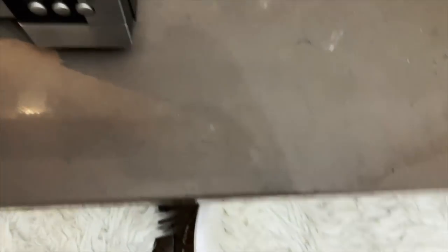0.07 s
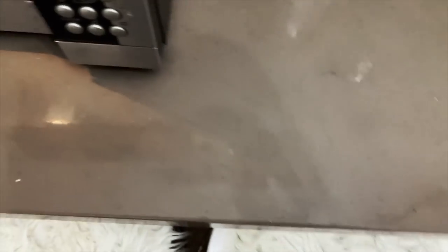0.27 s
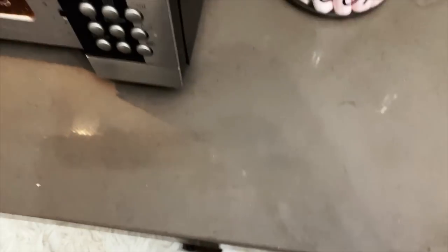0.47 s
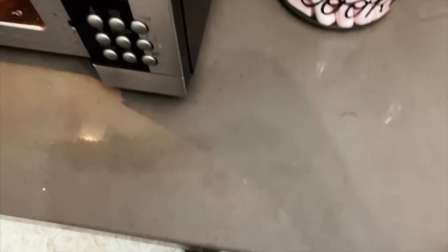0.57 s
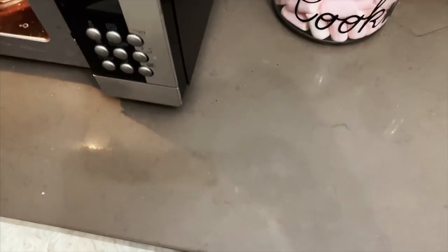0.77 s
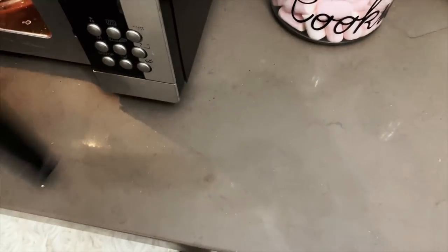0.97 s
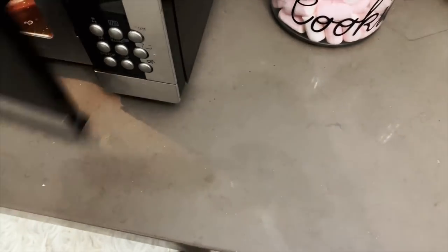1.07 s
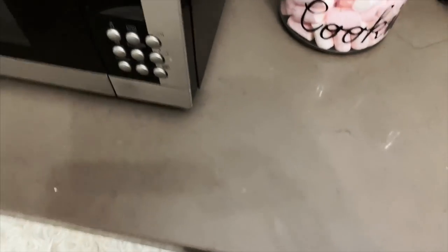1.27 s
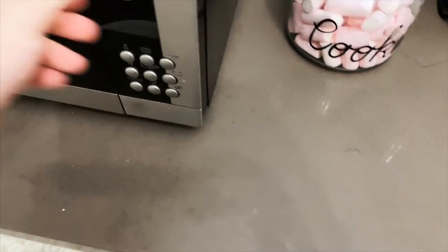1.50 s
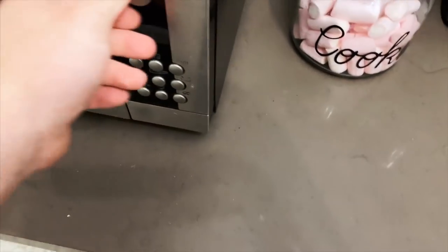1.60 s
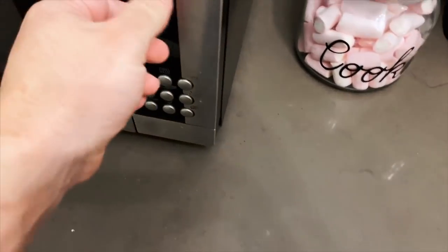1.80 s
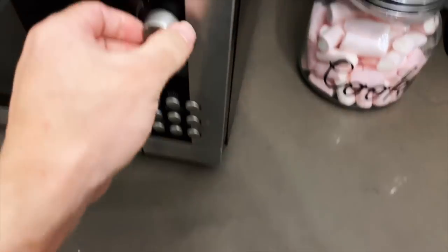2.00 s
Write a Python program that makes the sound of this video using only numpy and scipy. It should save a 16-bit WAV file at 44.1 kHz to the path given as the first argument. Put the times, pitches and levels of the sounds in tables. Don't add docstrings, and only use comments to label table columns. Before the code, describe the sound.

A microwave oven door swings shut with a sharp, rattling metallic clunk in a kitchen

```python
import sys
import numpy as np
from scipy import signal
from scipy.fft import rfft, irfft
from scipy.io import wavfile

SR = 44100
rng = np.random.default_rng(int(sys.argv[2]) if len(sys.argv) > 2 else 0)


def put_to_file(sound):
    columns = np.atleast_2d(sound).T
    safe = np.clip(columns, -1, 1)
    whole_steps = np.round(safe * 32767)
    wavfile.write(sys.argv[1], SR, whole_steps.astype(np.int16))


def nominal_scale(level):
    x = np.asarray(level, float) / 20
    return 10 ** x


N = 90404
LEAD = 8820
M = N + LEAD

# (time [s], crack [dB], treble against the crack [dB], thump [dB], sheet ring [dB])
BLOWS = [
    (-.03, -20, -5.5, -26, -58),
    (1.1092, -15, 0, -34, -26.5),
    (1.1217, -23, -3, -30, -34),
    (1.1325, -15.5, 12.5, -17.5, -20),
    (1.144, -14, 5, -24, -36),
    (1.152, -15.5, -15, -11, -26.5),
    (1.160, -16, 4.5, -18, -38),
    (1.177, -24.5, -15, -15, -25),
    (1.297, -21, -4, -53, -15),
]


def rms_one(x):
    return x / np.sqrt(np.mean(x ** 2) + 1e-20)


def at_hz(points, hz):
    return np.interp(np.log(hz), np.log(np.array(points)[:, 0]), np.array(points)[:, 1])


def since(s):
    return (np.arange(M) - LEAD) / SR - s


def dying(s, decay_s):
    t = since(s)
    return (t >= 0) * np.exp(-np.maximum(t, 0) / decay_s)


def ring(x, hz, t60):
    r, w = nominal_scale(-60 / (t60 * SR)), 2 * np.pi * hz / SR
    return signal.lfilter([0, np.sin(w)], [1, -2 * r * np.cos(w), r * r], x + 1e-18)


def peak(x, hz, width_hz):
    return signal.lfilter(*signal.iirpeak(hz, hz / width_hz, fs=SR), x)


def colour(x, spectrum):
    hz = np.linspace(0, SR / 2, 513)
    cepstrum = irfft(np.log(nominal_scale(at_hz(spectrum, np.maximum(hz, 1)))))
    cepstrum[1:512] *= 2
    h = irfft(np.exp(rfft(cepstrum[:513], 1024)))
    return signal.fftconvolve(x, h / np.sqrt(np.sum(h ** 2)))[:len(x)]


def soft_push():
    t, push_s = np.arange(1500) / SR, 0.001
    push = t * np.exp(-t / push_s * 2)
    return [push / push.sum()]


def strike(times, levels_db, modes, contact, spread_db):
    longest_cycles = 900
    at = (np.array(times) * SR).astype(int) + LEAD
    luck = rng.standard_normal((len(times), len(modes)))
    out = np.zeros(M)
    for k, (hz, db, t60) in enumerate(modes):
        clicks = np.zeros(M)
        clicks[at] = nominal_scale(np.array(levels_db) + db + spread_db * luck[:, k])
        hits = signal.fftconvolve(clicks, contact[k % len(contact)])[:M]
        out += ring(hits, hz, min(t60, longest_cycles / hz))
    return out


def bands(length, likeness, gain):
    edges = 22 * 2 ** np.arange(0, 9.6, .5)
    out, white = 0, rng.standard_normal((2, 2, length))
    for k, (low, high) in enumerate(zip(edges, edges[1:])):
        band = signal.butter(2, [low, high], "band", fs=SR, output="sos")
        mid, side = signal.sosfilt(band, white[k % 2])
        hz = np.sqrt(low * high)
        alike = np.clip(at_hz(likeness, hz), -1, 1)
        out = out + gain(hz) * (np.sqrt(1 + alike) * mid + np.sqrt(1 - alike) * side * [[1], [-1]])
    return out


def hard_contacts():
    per_s, spread_db = 5000, 1
    strength = nominal_scale(spread_db * np.minimum(rng.exponential(1, M), 4))
    return rms_one(strength * rng.choice([-1, 1], M) * (rng.random(M) < per_s / SR))


def unsteadiness():
    depth, rate_hz = .35, 45
    slow = signal.butter(2, rate_hz, fs=SR, output="sos")
    return 1 + depth * rms_one(signal.sosfilt(slow, rng.standard_normal(M)))


def hook_rattle(contacts):
    # (frequency [Hz], density [dB per Hz])
    crack = [(180, -51.5), (300, -7.5), (1870, -18.5), (2070, -18.5), (3690, -23.5), (9930, -31.5),
             (11900, -27), (13800, -31), (15500, -44)]
    decay_s, split_hz = .009, 6500
    s, crack_db, treble_db, _, _ = np.transpose(BLOWS)
    out = 0
    for kind, levels_db in (("low", crack_db), ("high", crack_db + treble_db)):
        bursts = contacts * sum(nominal_scale(db) * dying(start, decay_s) for start, db in zip(s, levels_db))
        split = signal.butter(4, split_hz, kind, fs=SR, output="sos")
        out = out + signal.sosfilt(split, colour(bursts, crack))
    return out


def frame_thump():
    # (frequency [Hz], level [dB], t60 [s])
    cabinet = [(168, -11, 0.11), (211, 7.5, 0.098), (267.5, 1, 0.21), (323, -2, 0.31), (411, -4, 0.16),
               (556, -7, 0.13), (640, 2.5, 0.048), (732, 0, 0.084)]
    # (time [s], level [dB])
    settles = [
        (1.172, -16.5),
    ]
    # (frequency [Hz], level [dB], t60 [s])
    counter = [(66.7, -5.5, 0.33), (101.6, -1.5, 0.68), (115.7, -1.5, 0.25)]
    # (frequency [Hz], level [dB], t60 [s])
    door_leaf = [(147, 0.5, 0.89), (164, -5, 0.31)]
    s, _, _, thump_db, _ = np.transpose(BLOWS)
    push = soft_push()
    thump = strike(s, thump_db, cabinet, push, spread_db=3.0)
    thump += strike(*np.transpose(settles), counter, push, spread_db=1.5)
    return thump + strike([1.49], [-32.5], door_leaf, push, spread_db=1.5)


def sheet_metal(wobble):
    # (frequency [Hz], level [dB], t60 [s])
    sheet_modes = [(350, -6, .2), (400, -7, .15), (452, -6, .25), (690, -6, .08), (883, -7, .1),
                   (1140, -10, .05), (1376, -9, .12), (2063, -13, .04), (2530, -18, .15), (2590, -16, .5),
                   (3850, -7, .04), (4150, -6, .015), (4600, -6, .012), (5500, -15, .012)]
    s, _, _, _, ring_db = np.transpose(BLOWS)
    click = rng.choice([-1., 1.], (len(sheet_modes), 1))
    return wobble * strike(s, ring_db, sheet_modes, click, spread_db=2.0)


def loose_parts():
    # (time [s], frequency [Hz], level [dB], t60 [s])
    single_rings = [(1.1105, 456, -15.5, 0.11), (1.1105, 720, -17.5, 0.16), (1.1105, 2430, -19.5, 0.046),
                    (1.1105, 4750, -26, 0.064), (1.1105, 3800, -20.5, 0.036), (1.1330, 640, -13, 0.12),
                    (1.1335, 3800, -14, 0.041), (1.1335, 2900, -20, 0.078), (1.147, 2065, -17.5, 0.1),
                    (1.160, 1500, -17.5, 0.057), (1.163, 410, -20, 0.12), (1.176, 540, -13.5, .2),
                    (1.182, 654, -19.5, .14), (1.186, 1200, -18.5, 0.06), (1.20, 2400, -43, .4),
                    (1.215, 1376, -24, 0.23), (1.235, 780, -27, 0.074), (1.297, 2590, -31.5, .5),
                    (1.325, 2590, -26, 0.23), (1.381, 2590, -33.5, 0.21), (1.312, 3870, -23, 0.047),
                    (1.32, 880, -23.5, 0.091), (1.335, 470, -19, 0.086), (1.40, 459.6, -25.5, 0.22),
                    (1.305, 330, -23, 0.11), (1.2975, 3950, -19, .02), (1.19, 760, -20, 0.06),
                    (1.152, 270, -17, 0.11), (1.120, 520, -19, 0.073), (1.165, 330, -18.5, 0.11)]
    return sum(strike([s], [db], [(hz, 0, t60)], [[1.]], spread_db=0.5) for s, hz, db, t60 in single_rings)


def low_swings():
    # (time [s], rise [s], frequency [Hz], level [dB])
    swings = [
        (1.1399, 0.016, 128.5, 0.5),
        (1.19, 0.023, 110.2, -14),
        (1.301, .044, 156.3, -17.5),
        (1.405, .035, 145, -26.5),
        (1.451, 0.026, 150, -32.5),
    ]
    sharpness = 5.4
    out = 0
    for s, rise_s, hz, db in swings:
        t = np.maximum(since(s), 0)
        swell = (t / rise_s * np.exp(1 - t / rise_s)) ** sharpness
        out = out + nominal_scale(db) * swell * np.sin(2 * np.pi * hz * t)
    return out


def door_shudder(contacts):
    # (frequency [Hz], density [dB per Hz])
    buzz_spectrum = [(300, -4.5), (700, -1.5), (1500, 4), (3000, 0.5), (6000, -3.5), (8000, -16)]
    # (frequency [Hz], width [Hz], level [dB])
    buzz_peaks = [(1970, 150, -25), (2570, 240, 3.5), (3870, 98, 9), (4250, 210, -18), (6040, 410, 3),
                  (6940, 330, -5.5)]
    buzz = contacts * nominal_scale(-29) * dying(1.303, 0.054)
    dull = signal.butter(4, 6500, fs=SR, output="sos")
    out = signal.sosfilt(dull, colour(buzz, buzz_spectrum))
    return out + sum(nominal_scale(db + 5.5) * peak(buzz, hz, width_hz) for hz, width_hz, db in buzz_peaks)


def knob():
    # (time [s], peak [dB], low mode [Hz], middle mode [Hz], top mode [Hz])
    detents = [
        (1.763, -30, 4020, 4500, 10000),
        (1.7831, -29, 4120, 4800, 9900),
        (1.8071, -30, 3200, 5250, 10170),
        (1.8315, -30, 3130, 5000, 8960),
        (1.8722, -30.5, 3300, 4980, 9500),
        (1.9062, -33.5, 4650, 5940, 9500),
    ]
    # (frequency [Hz], level [dB], t60 [s])
    plastic = [(1253, -9, 0.024), (1690, -26, 0.0049), (2260, -9, 0.044), (2830, -11.5, 0.0049),
               (3760, -6, 0.0053), (6500, -13, .003), (7660, 5, 0.0034), (13800, -11, 0.0064)]
    # (level [dB], t60 [s])
    grip = [
        (0, 0.013),
        (2, 0.0063),
        (4, 0.0066),
    ]
    scrape_s, longest_cycles, detune, spread_db = 0.003, 90, .015, 1.5
    length = 4000
    t = np.arange(length) / SR
    luck = rng.standard_normal((len(detents), len(plastic) + len(grip), 2))
    out = np.zeros(M + length)
    for (s, db, *tuned), rows in zip(detents, luck):
        scrape = rng.standard_normal(length) * t * np.exp(-t / scrape_s * 2)
        scrape = scrape / np.sqrt((scrape ** 2).sum())
        at = int(s * SR) + LEAD
        modes = [*plastic, *((hz, *rest) for hz, rest in zip(tuned, grip))]
        for (hz, mode_db, t60), (louder, sharper) in zip(modes, rows):
            level = nominal_scale(db - 2.5 + mode_db + spread_db * louder)
            pitch = hz * (1 + detune * np.tanh(sharper))
            out[at:at + length] += level * ring(scrape, pitch, min(t60, longest_cycles / hz))
    return out[:M]


def bright_ticks():
    # (time [s], peak [dB], body against the peak [dB])
    tick_list = [(0.0422, -31.5, -10.5), (0.1515, -47.5, -7), (0.2445, -56, 2), (0.348, -55, -1.5),
                 (0.4075, -51, -4), (0.4255, -31, -14), (0.4757, -33, -13), (0.5212, -30.5, -18.5),
                 (0.5767, -32, -15.5), (0.6878, -52, 3), (0.785, -55, 4), (0.8847, -54, 2.5),
                 (0.9901, -57, -19), (1.3751, -31, -13), (1.4548, -34.5, -14), (1.5595, -31.5, -18),
                 (1.6606, -51, -2), (1.6839, -30.5, -19), (1.7498, -28, -18), (1.9135, -28, -30),
                 (1.9754, -50, -17), (1.9909, -29, -19.5)]
    # (frequency [Hz], density [dB per Hz])
    bright = [(1500, -41), (4000, -12), (7000, -10), (10000, 7), (14000, 2.5), (16000, -18.5)]
    # (frequency [Hz], density [dB per Hz])
    dull = [(700, -0.5), (2000, 3), (4500, 0.5), (8000, 0.5), (12000, 3)]
    echo_s, echo_db, snap_db = 0.0025, -14, 13.5
    fizz_s, fizz_db, body_s = 0.0036, -6, 0.015
    snap, fizz, body = np.zeros(M), np.zeros(M), np.zeros(M)
    for s, db, body_db in tick_list:
        snap[int(s * SR) + LEAD] = nominal_scale(db + snap_db)
        snap[int((s + echo_s) * SR) + LEAD] = nominal_scale(db + snap_db + echo_db)
        fizz += nominal_scale(db + fizz_db) * dying(s, fizz_s)
        body += nominal_scale(db + body_db) * dying(s, body_s)
    sharp = colour(snap + fizz * rng.standard_normal(M), bright)
    return sharp + colour(body * rng.standard_normal(M), dull)


def earlier_knock(contacts, wobble):
    # (frequency [Hz], level [dB], t60 [s])
    cupboard = [(69.5, -3, 0.29), (140.67, -0.5, 0.72), (150, 3.5, 0.39), (221, 7, 0.13), (332, -5, 0.34),
                (371, -4, 0.79), (436, 2.5, 0.26), (455, -1.5, 0.72), (483.3, -3.5, 0.76), (539.6, 2, 0.24),
                (593, -6, 0.76), (690, -5, 0.35), (1003, -3, 0.27)]
    # (frequency [Hz], density [dB per Hz])
    dishes = [(200, -7), (550, -0.5), (1500, -3.5), (3000, -6.5), (5000, -19), (8000, -28)]
    s = -0.013
    clatter = contacts * nominal_scale(-36) * dying(s, 0.057)
    return wobble * strike([s], [-26], cupboard, soft_push(), spread_db=1) + colour(clatter, dishes)


def ports(x, pan_db):
    # (frequency [Hz], phase [rad])
    port_phase = [(60, 0.066), (250, 0.31), (600, 1.39), (1200, 1.72), (3000, 1.02), (8000, 1.46),
                  (14000, 1.05)]
    turn = at_hz(port_phase, np.maximum(np.fft.rfftfreq(M, 1 / SR), 1)) / 2
    side = np.array([[1], [-1]])
    return nominal_scale(pan_db * side) * irfft(rfft(x) * np.exp(1j * side * turn), M)


def kitchen(x):
    # (frequency [Hz], t60 [s])
    room_t60 = [(60, 1), (200, 0.99), (450, 0.64), (1000, 0.58), (3000, 0.49), (8000, 0.45), (14000, 0.28)]
    # (frequency [Hz], left-right likeness [-1..1])
    room_likeness = [(60, 0.99), (200, 0.82), (500, 0.74), (1000, -0.34), (3000, 0.19), (12000, -0.12)]
    # (frequency [Hz], level [dB])
    room_colour = [(60, -3), (150, -4), (500, 6), (2000, 7.5), (6000, 1.5), (14000, 0.5)]
    build_s = 0.0013
    t = np.arange(SR) / SR
    tail = bands(SR, room_likeness, lambda hz: nominal_scale(at_hz(room_colour, hz) - 60 * t / at_hz(room_t60, hz)))
    tail = tail * (1 - np.exp(-t / build_s))
    return signal.fftconvolve(x[None], tail / np.sqrt(np.sum(tail ** 2) / 2), axes=1)[:, :M]


def rustles():
    # (time [s], length [s], level [dB], centre [Hz], width [Hz])
    swells = [
        (0.359, 0.046, -55.5, 1030, 1480),
        (0.587, 0.036, -56.5, 1670, 1980),
        (0.766, 0.17, -63.5, 5130, 2960),
        (1.026, 0.032, -48.5, 1000, 890),
        (1.029, 0.0057, -47.5, 4980, 318),
        (1.03, 0.0035, -45, 5950, 300),
        (1.76, 0.18, -57, 2330, 2540),
    ]
    out, white = 0, rng.standard_normal((len(swells), 2, M))
    for (s, length_s, db, hz, width_hz), noise in zip(swells, white):
        swell = np.sqrt(np.sin(np.pi * np.clip(since(s) / length_s, 0, 1)).clip(0))
        out = out + nominal_scale(db) * swell * rms_one(ring(noise + noise[0], hz, 3.8 / width_hz))
    return out


def appliances():
    # (frequency [Hz], density [dB per Hz])
    rumble = [(15, -39), (25, -1.5), (129, -2.5), (703, -19), (5580, -35), (8580, -41), (10600, -41),
              (12200, -45), (15500, -35)]
    # (frequency [Hz], left-right likeness [-1..1])
    hum_likeness = [(60, 1), (240, 0.88), (950, 0.13), (3770, 0.039), (15000, 0.01)]
    # (time [s], level [dB])
    hiss_level = [(0, 10), (.28, -6.5), (0.344, -14), (.36, 4.5), (.62, 1.5), (.66, -7), (.78, -8), (.86, -1.5),
                  (1.1, 3), (1.7, -0.5), (1.77, 5), (2.05, -1.5)]
    hiss_hz = 675
    hiss_db = np.interp(since(0), *np.transpose(hiss_level))
    hum = bands(M, hum_likeness, lambda hz: nominal_scale(at_hz(rumble, hz) + hiss_db * hz / (hz + hiss_hz)))
    return nominal_scale(-46.5) * rms_one(hum)


def scene():
    contacts, wobble = hard_contacts(), unsteadiness()
    body = hook_rattle(contacts) + frame_thump() + door_shudder(contacts) + earlier_knock(contacts, wobble)
    sheet, parts, swings = sheet_metal(wobble), loose_parts(), low_swings()
    dial, tick = knob(), bright_ticks()
    oven_send = body + nominal_scale(-11) * sheet + nominal_scale(-9.5) * parts + nominal_scale(-26) * swings
    wet = kitchen(nominal_scale(-5.5) * oven_send + nominal_scale(-7.5) * tick + nominal_scale(-7.5) * dial)
    near = ports(body + parts + sheet + swings + dial + tick, pan_db=0.62)
    return (near + wet + appliances() + rustles())[:, LEAD:]


def top_cut(x):
    return signal.sosfilt(signal.butter(12, 15680, fs=SR, output="sos"), x)


def record(dry):
    # (frequency [Hz], width [Hz], level [dB])
    dips = [
        (8500, 900, -12),
        (12000, 1500, -14),
    ]
    # (low edge [Hz], high edge [Hz], depth [dB])
    thinned = [
        (11500, 12650, 28),
        (8350, 8750, 14),
    ]
    x = signal.sosfilt(signal.butter(2, 65, "high", fs=SR, output="sos"), dry)
    for hz, width_hz, db in dips:
        x = x - (1 - nominal_scale(db)) * peak(x, hz, width_hz)
    x = signal.sosfilt(signal.cheby2(12, 50, 15700, fs=SR, output="sos"), x)
    x = np.clip(x, -1.0, 1.0)
    for low_hz, high_hz, db in thinned:
        x = signal.sosfilt(signal.cheby2(3, db, [low_hz, high_hz], "bandstop", fs=SR, output="sos"), x)
    return top_cut(x)


dry = scene()
out = record(dry)
put_to_file(out)
```